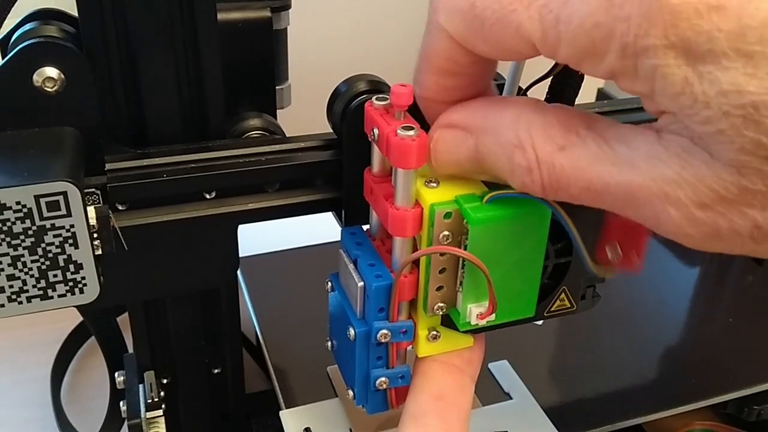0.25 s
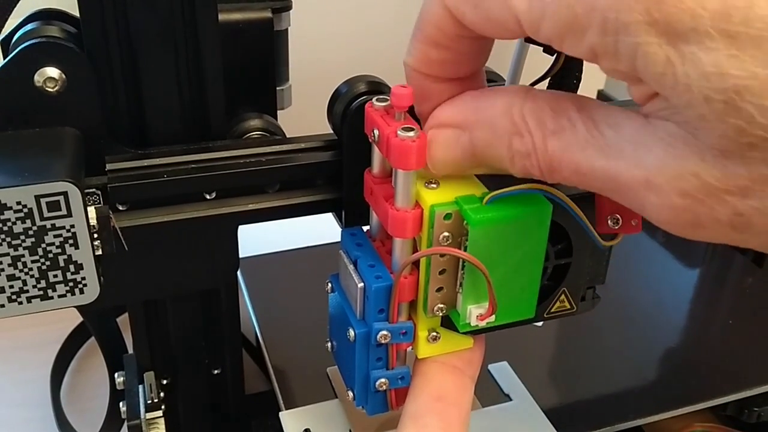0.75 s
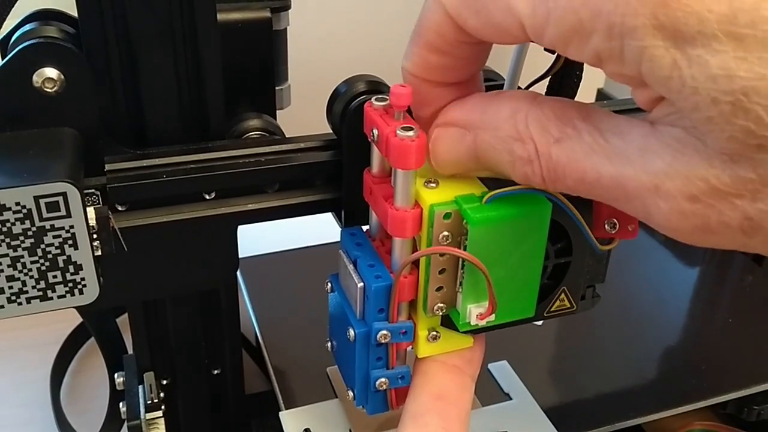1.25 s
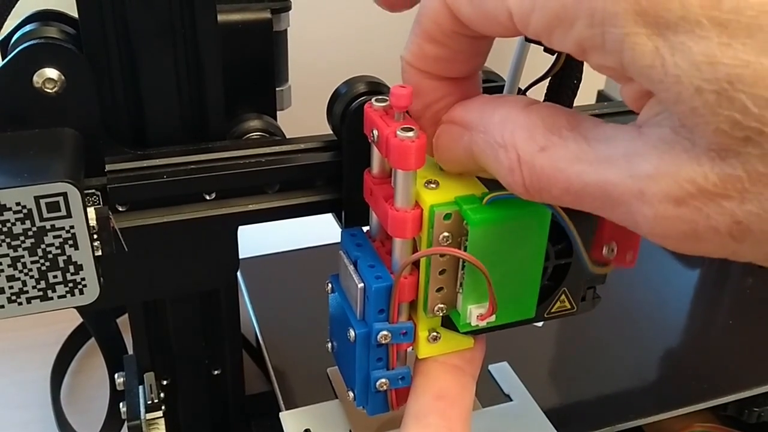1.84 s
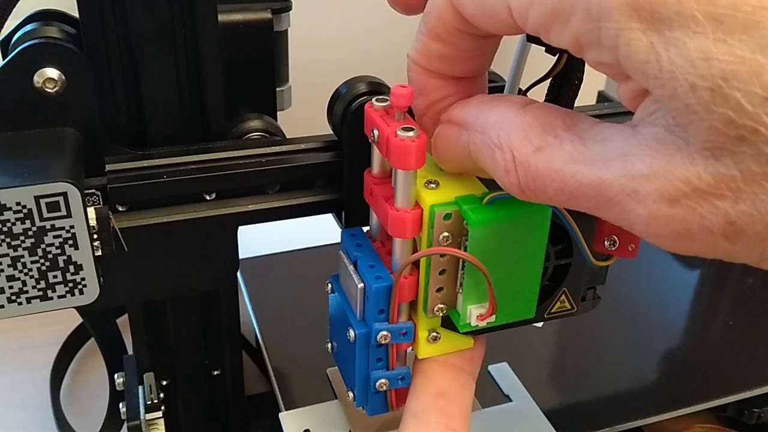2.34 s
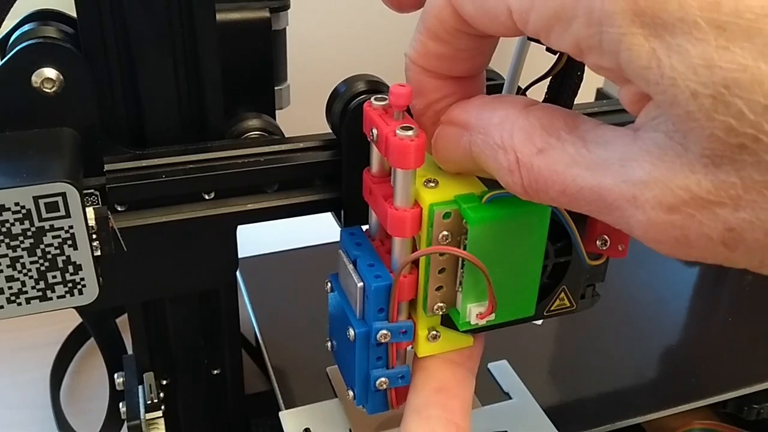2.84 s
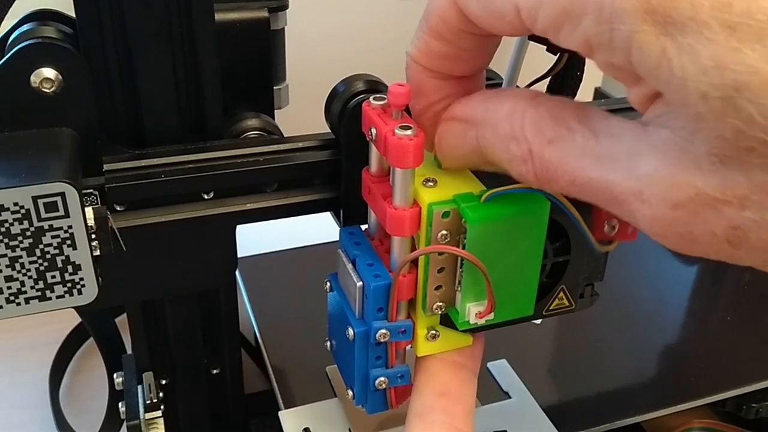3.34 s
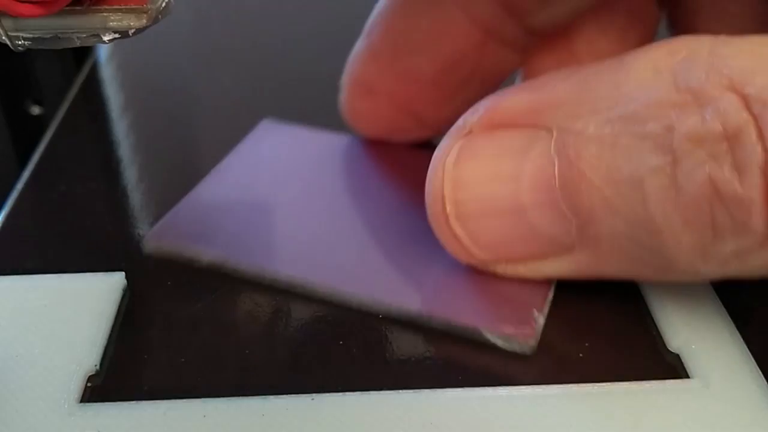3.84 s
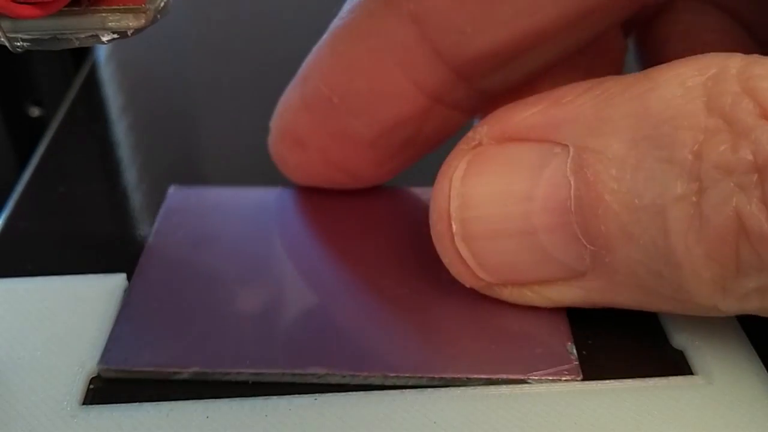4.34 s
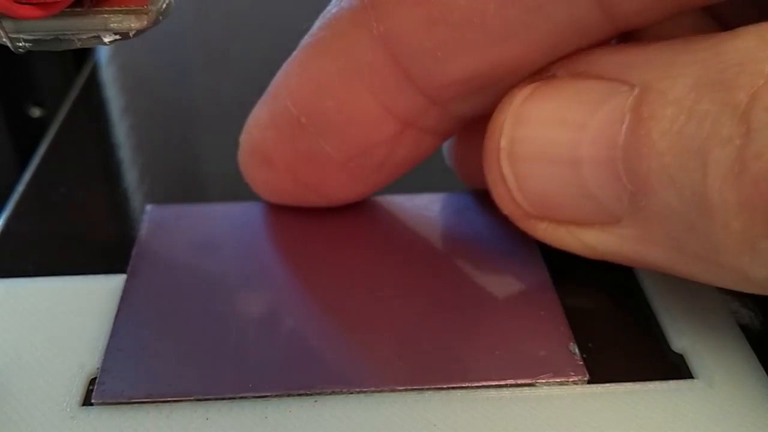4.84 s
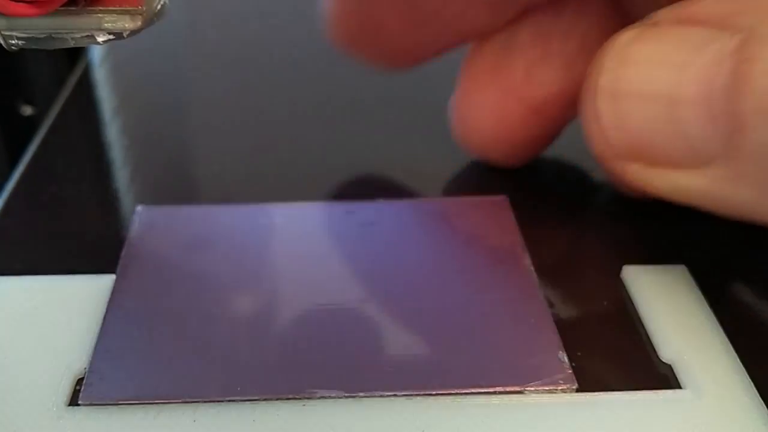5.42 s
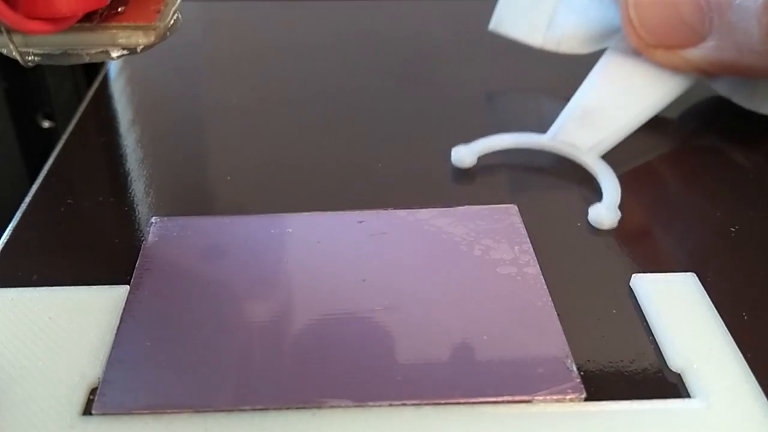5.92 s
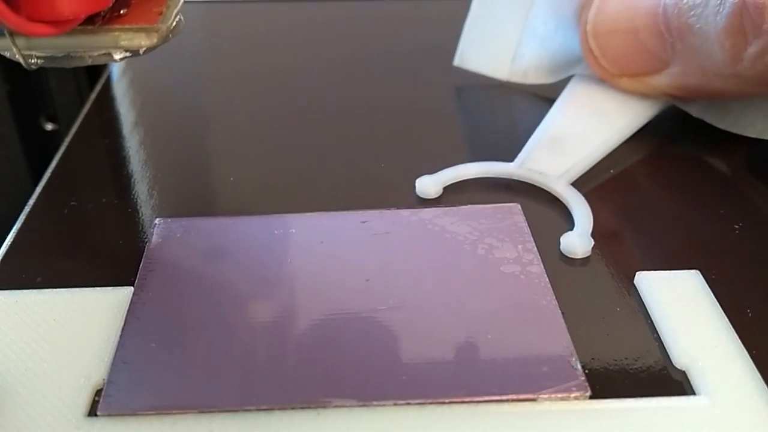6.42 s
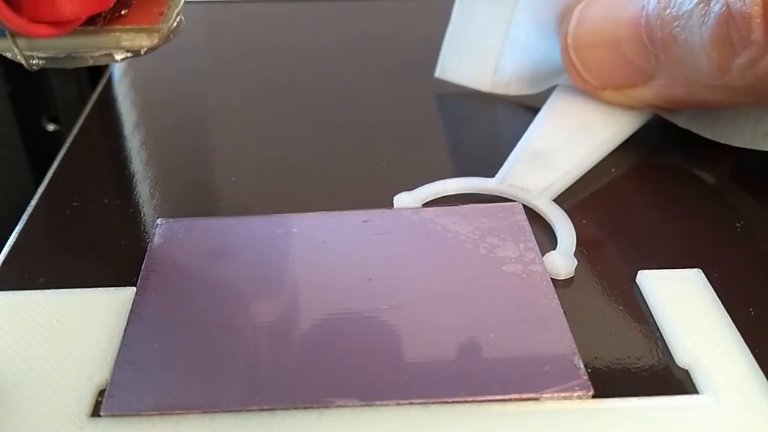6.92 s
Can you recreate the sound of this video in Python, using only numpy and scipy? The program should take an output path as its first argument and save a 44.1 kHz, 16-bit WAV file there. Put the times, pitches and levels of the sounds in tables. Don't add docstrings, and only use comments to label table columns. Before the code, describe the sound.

Small hard ticks and skin rubs as a part is fitted, then sharp clacks of a plate being seated, cutting abruptly to a whirring, whining 3D printer.

```python
import sys
import numpy as np
from scipy import signal
from scipy.fft import rfft, irfft, next_fast_len
from scipy.io import wavfile
from scipy.ndimage import uniform_filter1d

SR = 44100
rng = np.random.default_rng(int(sys.argv[2]) if len(sys.argv) > 2 else 0)


def convert_level_to_amplitude(level_db):
    exponent = np.asarray(level_db, float) / 20
    return 10 ** exponent


def put_to_file(sound):
    columns = np.atleast_2d(sound).T
    safe = np.clip(columns, -1, 1)
    whole_steps = np.round(safe * 32767)
    wavfile.write(sys.argv[1], SR, whole_steps.astype(np.int16))


N = 316197
HZ = np.fft.rfftfreq(N, 1 / SR)
TIME = np.arange(N) / SR
CHANGE_S = 6.1619


def unit(x):
    return x / np.sqrt(np.mean(x ** 2))


def walk(rate_hz):
    k = int(SR / rate_hz)
    held = np.repeat(rng.standard_normal(N // k + 1), k)
    return 1.3 * uniform_filter1d(uniform_filter1d(held, k), k)[:N]


def band(x, hz, width_hz):
    return signal.lfilter(*signal.iirpeak(min(hz, 15000), hz / width_hz, SR), x)


def at_capsules(shared, own, alike_hz, lag):
    size = len(shared)
    alike = 1 / (1 + (np.fft.rfftfreq(size, 1 / SR) / alike_hz) ** 2)
    late = np.exp(-2j * np.pi * np.fft.rfftfreq(size) * lag)
    right = np.sqrt(alike) * late * rfft(shared) + np.sqrt(1 - alike) * rfft(own)
    return np.array([shared, irfft(right, size)])


def colour(pair, table):
    hz, *dbs = np.transpose(table)
    gains = [convert_level_to_amplitude(np.interp(np.log(HZ + 1), np.log(hz), db)) * np.sqrt(SR / 2) for db in dbs]
    low_cut = HZ ** 4 / (HZ ** 4 + 30 ** 4)
    return irfft(rfft(pair) * gains * low_cut, N)


def pushes(table):
    rise_share, edge_db = 0.44, -17
    power, t = 0, TIME[::32]
    for peak_s, length_s, *dbs in table:
        rising = (peak_s - t) / (rise_share * length_s)
        falling = (t - peak_s) / ((1 - rise_share) * length_s)
        place = np.where(t < peak_s, rising, falling)
        power = power + convert_level_to_amplitude(np.array(dbs)[:, None] + np.maximum(edge_db * place, -100)) ** 2
    return np.array([np.interp(TIME, t, np.sqrt(p)) for p in power])


def room():
    # pitch_hz [Hz], left_db, right_db [dB per Hz]
    hiss_colour = [(38.3, -92, -75), (68.6, -84.5, -76.5), (122, -84.5, -85.5), (245, -85, -90.5),
                   (463, -95.5, -93.5), (1170, -101.0, -102.0), (2250, -104.0, -105.0),
                   (4000, -102.0, -103.0), (6600, -106.0, -107.0), (9650, -112.0, -112.0),
                   (11500, -113.0, -112.0), (13600, -114.0, -111.0)]
    # time_s [s], level_db [dB]
    ride = [(0, -71), (.045, -78), (.33, -78), (.43, -74.5), (1.5, -71), (2.5, -72), (3.9, -71.5),
            (4.2, -72.5), (4.55, -72), (5.55, -71.5), (6.17, -72.5)]
    ride_db = np.interp(TIME, *np.transpose(ride))
    hiss = colour(rng.standard_normal((2, N)), hiss_colour) * convert_level_to_amplitude(ride_db + 70.5 + 0.15 * walk(18))
    whine = convert_level_to_amplitude(-91 + 4 * walk(1.5)) * np.sin(2 * np.pi * 11905 * TIME + walk(4))
    return hiss + whine


def leans():
    # peak_s [s], length_s [s], hum_db [dB], boom_db [dB]
    lean_rows = [(0.0, .2, -65, -64), (.28, 0.18, -66, -62.5), (.45, 0.29, -71, -70), (.95, 0.44, -68, -68),
                 (1.14, .3, -67, -79), (1.52, 0.44, -80, -65), (1.8, 0.48, -85, -59.5),
                 (3.11, 0.23, -70, -84), (3.3, 0.17, -71, -71), (3.65, 0.44, -74, -64),
                 (4.05, 0.91, -67.5, -68.5), (4.33, 0.12, -59, -56), (4.52, 0.27, -54.5, -57),
                 (4.75, .4, -68, -79), (5.0, .5, -66.5, -63.5), (5.22, 0.24, -51.5, -56),
                 (5.33, 0.13, -50.5, -74), (5.7, 1, -62.5, -61.5), (5.91, .16, -62, -55),
                 (6.11, 0.64, -56, -61)]
    idle_hum_db, idle_boom_db, idle_sway_db = -76.5, -79, 4
    modes = ((105, 41), (255, 85))
    hum, boom = (unit(band(band(rng.standard_normal(N), hz, w), hz, w)) for hz, w in modes)
    idle = [convert_level_to_amplitude(db + idle_sway_db * walk(8)) for db in (idle_hum_db, idle_boom_db)]
    hum_gain, boom_gain = np.hypot(pushes(lean_rows), idle)
    return hum * hum_gain * convert_level_to_amplitude(8) + boom * boom_gain * convert_level_to_amplitude(-1.5)


def jolts():
    # start_s [s], step_db [dB]
    jolt_rows = [
        (2.5068, -6),
        (3.3812, -7.5),
    ]
    # pitch_hz [Hz], sharpness [ratio]
    low_cuts = [(52.5, 2.3), (103.2, 1.21)]
    ramp_samples = 3.3
    x = sum(convert_level_to_amplitude(db) * np.clip((TIME - s) * SR / ramp_samples + .5, 0, 1) for s, db in jolt_rows)
    for hz, sharp in low_cuts:
        w = 2 * np.pi * hz
        x = signal.lfilter(*signal.bilinear([1, 0, 0], [1, w / sharp, w * w], SR), x)
    edge = signal.lfilter(*signal.butter(1, 450, "high", fs=SR), x)
    x = x - 0.36 * edge
    return np.array([x, 0 * x])


def taps():
    # start_s [s], peak_db [dB], ring_hz [Hz], t60_s [s]
    tap_rows = [
        (0.2402, -51, 1172, 0.081),
        (0.6194, -64, 1190, 0.09),
        (0.7903, -48.5, 1184, 0.051),
        (4.4566, -48.5, 1238, 0.078),
        (5.1677, -52, 1235, 0.083),
    ]
    out, t = np.zeros((2, N)), np.arange(6000) / SR
    for s, db, hz, t60 in tap_rows:
        push = rng.standard_normal(len(t)) * convert_level_to_amplitude(-60 * t / 0.0062)
        push = band(push, hz, 350)
        ring = band(push, hz, 1.8 / t60) + 0.14 * band(push, 1.107 * hz, 2.8 / t60)
        i = int(s * SR)
        out[:, i:i + len(t)] += convert_level_to_amplitude(db - 4.5) * ring / abs(ring).max() * [[1], [.8]]
    return out


def rubs():
    # peak_s [s], length_s [s],
    # level_db [dB], body_share_db [dB], sizzle_share_db [dB]
    rub_strokes = [
        (0.252, 0.044, -71, 11.5, -2),
        (0.287, .12, -68, 4, -2),
        (1.515, 0.17, -65.5, -11, -1.5),
        (1.6, .07, -65, -8, 3),
        (1.648, .08, -61, -5, 2),
        (1.776, .25, -78, 8, 5),
        (1.845, 0.1, -65, 1.5, 0),
        (3.53, 0.13, -63, -16, -19),
                   (4.012, 0.083, -65.5, 0, 6), (4.13, 0.52, -63, -17, -3),
                   (4.177, 0.064, -46, -15.5, -8.5), (4.255, 0.21, -57, -14, -5),
                   (4.29, 0.091, -53.5, -6.5, -2), (4.329, 0.023, -39, -19, 0),
                   (4.35, 0.13, -56.5, -3, 7.5), (4.461, 0.024, -50.5, 1.5, 2.5),
                   (4.472, 0.047, -55.5, 4, -4), (4.5, 0.23, -67, 5.5, -2.5), (4.599, 0.024, -56, -8, 0),
                   (4.95, 0.061, -65, 4, -5), (5.042, 0.06, -45.5, -9.5, -8), (5.182, 0.079, -59, 4, -8),
                   (5.245, 0.2, -65, 5.5, -5), (5.37, .12, -65.5, 3, -1), (5.475, 0.28, -51.5, -6.5, -10),
                   (5.6, 0.2, -50.5, -10.5, -6), (5.648, 0.093, -55, -0.5, 0), (5.75, 0.3, -69.5, 5, 4.5),
                   (5.9, 0.085, -47, -5.5, -1.5), (5.92, 0.056, -44.5, -3.5, -3),
                   (5.958, 0.056, -49, 0, -2.5), (6.09, 0.44, -72, 12, 1)]
    # pitch_hz [Hz], left_db [dB], right_db [dB]
    rub_colour = [(216, -84, -90.5), (497, -83.5, -77.5), (1300, -84, -92.5), (2780, -74.5, -78),
                  (4500, -75, -175.5), (7100, -91, -91), (9400, -102.0, -101.0), (13900, -105.0, -103.0)]
    slips = rng.standard_normal((2, N)) * convert_level_to_amplitude(2.2 * rng.exponential(size=N) + 1.8 * walk(90))
    grain = colour(at_capsules(*slips, 4000, 12.7), rub_colour)
    grain += 3.7 * band(grain, 1240, 85)
    spectrum = rfft(unit(grain))
    low = 1 / (1 + (HZ / 2200) ** 4)
    high = 1 / (1 + (7800 / (HZ + 1)) ** 6)
    body, rasp, sizzle = (unit(irfft(spectrum * g, N)) for g in (low, 1 - low - high, high))
    strokes = [(s, length, db, db + body_db, db + sizzle_db)
               for s, length, db, body_db, sizzle_db in rub_strokes]
    rasp_gain, body_gain, sizzle_gain = pushes(strokes)
    return convert_level_to_amplitude(-6.5) * rasp_gain * rasp + body_gain * body + convert_level_to_amplitude(2) * sizzle_gain * sizzle


def ticks():
    # start_s [s], peak_db [dB], ring_hz [Hz]
    part_ticks = [
        (1.5906, -46, 5610),
        (1.603, -41, 5830),
        (1.6108, -40, 6040),
        (1.6375, -37, 6410),
        (1.647, -42, 6900),
        (1.661, -45, 7030),
        (1.8374, -37, 5870),
        (2.5394, -51, 6740),
    ]
    # start_s [s], peak_db [dB], ring_hz [Hz], knock_share_db [dB], crack_share_db [dB]
    clacks = [(3.7859, -26.5, 5020, -24, -6), (3.962, -44.5, 6400, -19, -4),
              (4.0029, -30.5, 5300, -32, -2.5), (4.0082, -29, 5200, -26.5, -1),
              (4.148, -28.5, 4640, -24, -6), (4.1642, -39, 4000, -22, -10), (4.2704, -23, 3570, -5, -4.5),
              (4.2878, -35, 3890, -10, -18), (4.3296, -18.5, 5800, -31, -5), (4.333, -19, 2470, -22, -7),
              (4.4535, -38, 3600, -4, -12), (5.1665, -49, 3000, 0, -16), (5.037, -36.5, 4500, -35, -15),
              (5.3492, -37.5, 5660, -13, -7), (5.635, -42, 4000, -20, -16.5),
              (5.8852, -31.5, 7730, -26, -13), (5.914, -28.5, 6540, -21, -13),
              (5.9586, -36, 3380, -13, -10)]
    # start_s [s], peak_db [dB], ring_hz [Hz], knock_share_db, crack_share_db [dB]
    snaps = [
        (3.5013, -23, 3600, -32, -40),
        (3.9868, -53, 6000, -27, -8),
        (4.0842, -34.5, 4500, -36, -18),
        (4.1565, -24.5, 2700, -18, -5.5),
    ]
    rows = [(*row, -18, -5, 0.016, 0.74) for row in part_ticks]
    rows += [(*row, .016, 1.01) for row in clacks]
    rows += [(*row, .0098, .7) for row in snaps]
    out, t = np.zeros((2, N)), np.arange(5000) / SR
    for s, db, hz, knock_db, crack_db, t60, wide in rows:
        noise = rng.standard_normal((2, 4, len(t)))
        noise[:, :, 0] = 3.92
        fade = convert_level_to_amplitude(-60 * t / max(t60, .004))
        width_hz = wide * hz
        ring = band(band(band(noise[:, 0] * fade, hz, width_hz), hz, width_hz), hz, width_hz) * 1.44
        crack = convert_level_to_amplitude(crack_db) * band(noise[:, 1] * fade, 12200, 4400) * [[1], [2]]
        knock = band(band(noise[:, 2] * fade ** 0.66, 1200, 2700), 1100, 9000)
        knock = convert_level_to_amplitude(knock_db + 12.5) * knock * [[1.3], [.5]]
        tail = convert_level_to_amplitude(-34.5) * band(band(noise[:, 3], 3000, 3000), 3500, 5000) * convert_level_to_amplitude(-60 * t / 0.46)
        pair = at_capsules(*(ring + crack + knock + tail), 1500, 11.3) * [[1], [.62]]
        i = int(s * SR)
        out[:, i:i + len(t)] += convert_level_to_amplitude(db) * pair / abs(pair[0]).max()
    return out


def printer():
    # pitch_hz [Hz], left_db, right_db [dB per Hz]
    fan_colour = [(45, -71, -66), (71, -71, -76.5), (117, -67.5, -70.5), (270, -70, -88), (535, -71, -77.5),
                  (905, -75, -90), (1340, -81, -79), (1940, -81.5, -80), (2440, -69, -91.5),
                  (3450, -83, -80), (4120, -75.5, -82.5), (6000, -87, -91), (9400, -99.5, -98),
                  (14000, -101.0, -100.0)]
    # pitch_hz [Hz], width_hz [Hz], level_db [dB], right_share [ratio, negative is inverted]
    fan_humps = [(460, 43, -61, 0.78), (640, 33, -57, 0.25), (1081, 150, -53.5, 0.5),
                 (1790, 300, -68, -0.36), (2227, 230, -43, -0.25), (3780, 120, -71, -0.26),
                 (4220, 440, -65, -0.083)]
    whine_hz = [75.3, 113, 150.6, 188, 300.5, 447, 652, 774, 798.5, 1598, 2396, 3197, 4786, 7177, 9570,
                11962]
    whine_left_db = [-44, -42, -50, -55, -54, -62, -57, -59, -58, -53.5, -40.5, -55, -64, -60, -65, -75]
    whine_right_db = [-50, -43, -52, -57, -64, -62, -70, -58, -84, -49, -47.5, -60, -71, -74, -65, -75]
    air = rng.standard_normal((2, N)) * convert_level_to_amplitude(.5 * np.array([walk(25), walk(25)]))
    sound = colour(at_capsules(*air, 670, 8.6), fan_colour)
    on = slice(int(CHANGE_S * SR), N)
    for hz, width_hz, db, right in fan_humps:
        panel = band(band(rng.standard_normal(N), hz, width_hz), hz, width_hz)
        sound[:, on] += convert_level_to_amplitude(db + 1.2 * walk(15)[on]) * unit(panel)[on] * [[1], [right]]
    late_s = np.array([[0], [3.0 / SR]])
    for hz, *dbs in zip(whine_hz, whine_left_db, whine_right_db):
        turn = 2 * np.pi * hz * (TIME[on] - late_s) + rng.uniform(0, 2 * np.pi) + .5 * walk(9.9)[on]
        level = convert_level_to_amplitude(np.array(dbs)[:, None] + 0.81 * walk(7)[on])
        sound[:, on] += np.sqrt(2) * level * np.sin(turn)
    return sound


def scene():
    hands = room() + leans() + jolts() + taps() + rubs() + ticks()
    return np.where(TIME < CHANGE_S, hands, printer())


def top_cut(x):
    return signal.sosfilt(signal.butter(12, 15600, fs=SR, output="sos"), x)


def record(dry):
    # share [ratio], roll_off_hz [Hz], lag [samples], bend [rad at 6 kHz]
    crossfeed = [(.93, 4400, 17.8, .2), (.93, 4400, 17.5, .25)]
    share, roll_hz, lag, bend = np.transpose(crossfeed)[:, :, None]
    size = next_fast_len(N + 4096)
    hz = np.fft.rfftfreq(size, 1 / SR)
    cross = share / np.sqrt(1 + (hz / roll_hz) ** 2)
    cross = cross * np.exp(-2j * np.pi * hz * lag / SR + 1j * bend * (hz / 6000) ** 2)
    capsules = rfft(dry, size)
    capsules[1] *= convert_level_to_amplitude(2.2 * np.exp(-((hz - 12800) / 2200) ** 2))
    top = convert_level_to_amplitude(-40 * np.clip((hz - 14220) / 180, 0, 1))
    mix = irfft((capsules - cross * capsules[::-1]) * top, size)[:, :N]
    return top_cut(mix)


dry = scene()
out = record(dry)
put_to_file(out)
```